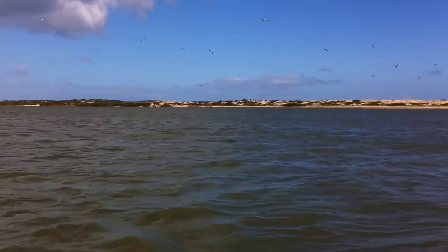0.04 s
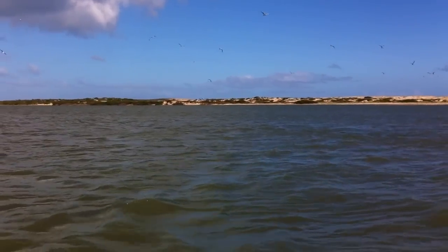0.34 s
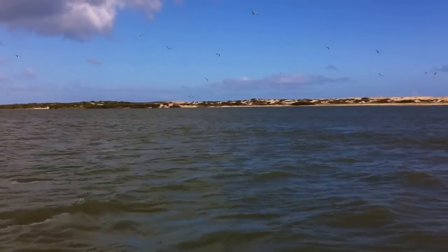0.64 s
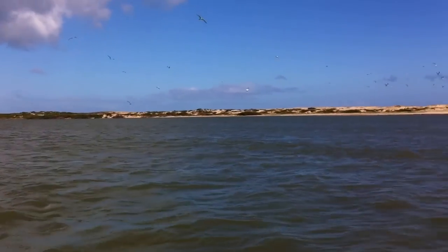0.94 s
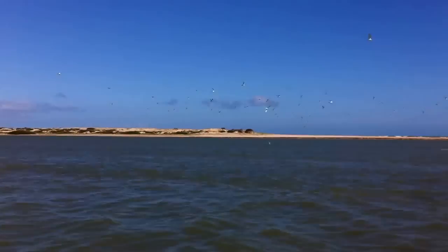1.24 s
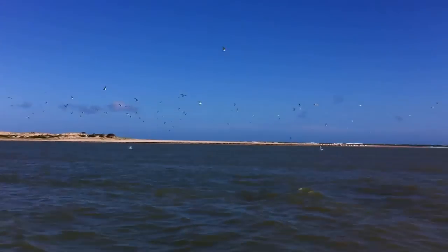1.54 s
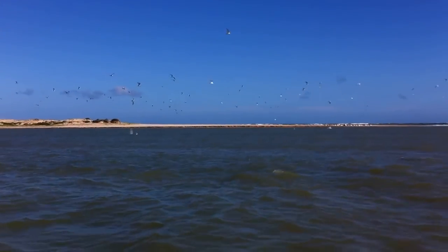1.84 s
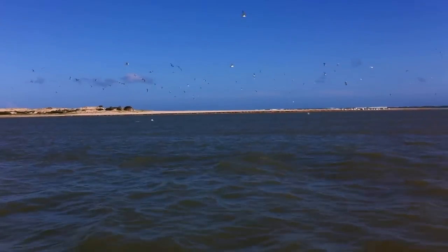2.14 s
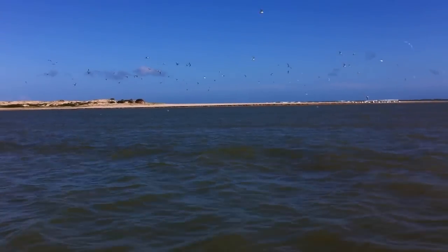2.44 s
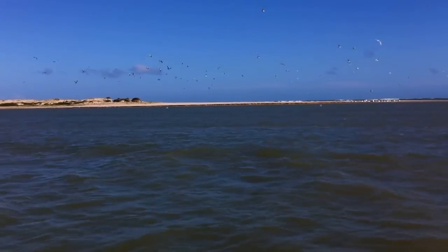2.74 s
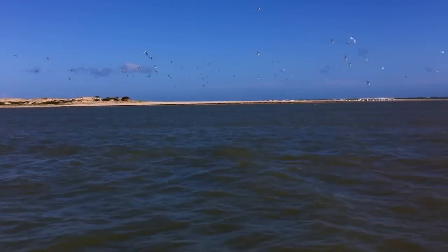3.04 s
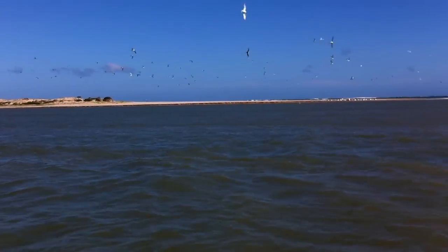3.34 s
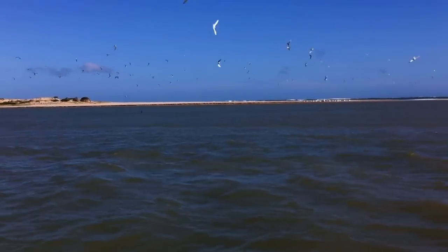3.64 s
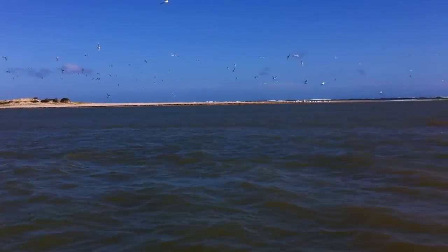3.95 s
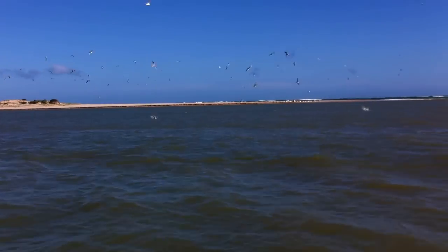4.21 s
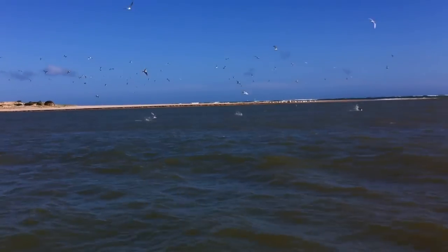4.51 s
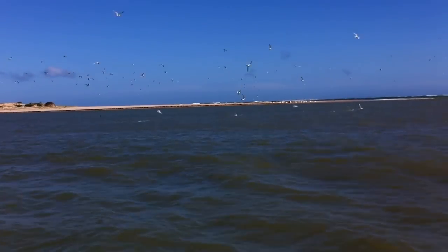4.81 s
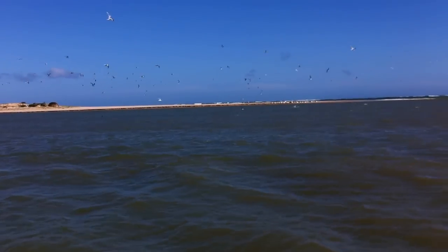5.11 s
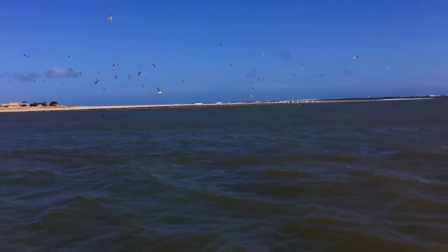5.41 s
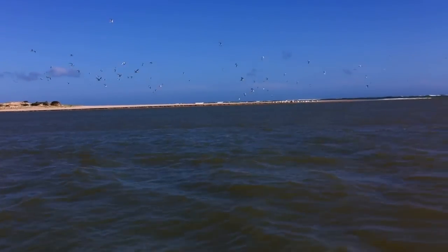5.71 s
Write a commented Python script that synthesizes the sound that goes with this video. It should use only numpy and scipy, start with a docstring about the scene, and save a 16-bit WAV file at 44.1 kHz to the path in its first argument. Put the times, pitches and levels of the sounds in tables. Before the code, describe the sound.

Wind buffets the microphone for the whole six seconds, just above choppy open water: an uneven low rumble with flutter and frequent dull thumps, hardest around 0.5, 1.3, 1.9 and 5.5 seconds. Much quieter, wavelets slosh and gurgle with a light fizz of spray. The water swells a little from about 3 to 4.7 seconds, and close drops land with tiny bright spits near 1.4, 3.7 and 4.6 seconds. Terns call at a distance in short, high, buzzy whistles, trilled and mostly falling. Several come in the first 0.8 seconds. At about 1.7 seconds one near bird gives a louder, quick rasping call that drops in steps, and others answer right after. More cries follow from 2.4 to 3.2 seconds, then a busier, overlapping run from 3.9 to 5.8 seconds, with the wind still gusting.

```python
"""A choppy estuary, heard from just above the water, with terns calling.
Wind eddies rumble, flutter and thump on the microphone. Wavelets slosh, trap ringing bubbles
and throw a fizz of spray. The terns' cries are buzzy, mostly falling whistles chopped by a
trill, some clearing at the end; one near bird gives a quick, rasping call that falls in steps."""
import sys
import numpy as np
from scipy import signal
from scipy.fft import rfft, irfft, next_fast_len
from scipy.io import wavfile
from scipy.ndimage import uniform_filter1d

SR = 44100
rng = np.random.default_rng(int(sys.argv[2]) if len(sys.argv) > 2 else 0)


def put_to_file(sound):
    """Save the sound as 16-bit audio at rate SR, in the file named by the first command-line argument."""
    columns = np.atleast_2d(sound).T  # one column per channel
    safe = np.clip(columns, -1, 1)
    whole_steps = np.round(safe * 32767)
    wavfile.write(sys.argv[1], SR, whole_steps.astype(np.int16))


N = 258867
T = np.arange(N) / SR
TOP_HZ = 15900
JITTER, RASP = .009, .02  # unsteadiness of a tern's voice, as shares of its pitch
BEAK_HZ, OVERTONE_DB_PER_OCTAVE = 3600, -45  # notes above this pitch lose their overtones

# bright hiss of the fizz and close drops, as coloured by the microphone: f/Hz, level/dB
HISS_AT_MIC = [(1500, 10.5), (3000, 10), (4500, 5), (6000, 9), (7000, 2.5), (9300, 3), (10300, -4.5),
               (11200, -5), (12000, 0), (13000, 0), (14200, -8), (16000, -4.5)]


def undb(db):
    """Decibels to gain."""
    return 10 ** (np.asarray(db) / 20)


def unit(x):
    """Scale to rms 1."""
    return x / np.sqrt(np.mean(x ** 2) + 1e-18)


def gains(table):
    """The dB columns of a level curve as a gain for every sample."""
    s, *columns = np.transpose(table)
    return [undb(np.interp(T, s, c)) for c in columns]


def colour(x, points):
    """Equalise by a curve of f/Hz, level/dB points."""
    hz, db = np.transpose(points)
    size = next_fast_len(len(x) + 2048)
    f = np.fft.rfftfreq(size, 1 / SR)
    response = undb(np.interp(np.log(f + 1), np.log(hz), db))
    return irfft(rfft(x, size) * response, size)[:len(x)]


def band(x, lo_hz, hi_hz):
    """Second-order band-pass."""
    edges = np.clip([lo_hz, max(hi_hz, 1.1 * lo_hz)], 10, [.4 * SR, .45 * SR])
    return signal.sosfilt(signal.butter(2, edges, "band", fs=SR, output="sos"), x)


def walk(rate):
    """Random modulation that glides to a new value rate times a second; rms 1."""
    hold = max(int(SR / rate), 1)
    steps = np.repeat(rng.standard_normal(N // hold + 1), hold)
    return unit(uniform_filter1d(steps, hold)[:N])


def even(x, span_s):
    """Level a texture to rms 1 over span_s, keeping its quick grain."""
    span = max(int(span_s * SR), 1)
    power = uniform_filter1d(uniform_filter1d(x ** 2, span), span)
    return x / np.sqrt(power + 1e-12)


def add(out, s, x):
    """Mix a short sound in at time s."""
    i = int(np.clip(s * SR, 0, len(out) - 1))
    out[i:i + len(x)] += x[:len(out) - i]


def bursts(rate, decay_s, rise_s=0.0025):
    """Little surges at random moments: each starts quickly and dies away."""
    starts = (rng.random(N) < rate / SR) * rng.random(N)
    surges = signal.lfilter([1], [1, -np.exp(-1 / (decay_s * SR))], starts)
    return uniform_filter1d(surges, max(int(rise_s * SR), 1))


def plateau(s, length, attack_s, release_s):
    """An envelope that rises around time s, holds and falls."""
    return np.clip(.5 + np.minimum((T - s) / attack_s, (s + length - T) / release_s), 0, 1)


def airflow(breeze_db=1, lull_db=3.5, breeze_flutter_db=-11, gust_db=-2.5):
    """Envelopes of the large and the small eddies: a restless breeze with short gusts over it."""
    # the breeze between gusts: t/s, level/dB
    breeze_curve = [(0.0, -23.5), (0.75, -25.5), (1.08, -33.5), (1.2, -29), (1.4, -21.5), (1.58, -33),
                    (1.8, -23), (2.0, -27.5), (2.72, -29), (3.0, -30), (3.21, -25.5), (3.6, -29),
                    (3.86, -30), (4.55, -26), (4.88, -33.5), (5.2, -21.5), (5.43, -30), (5.57, -19.5),
                    (5.7, -38), (5.87, -20.5)]
    # gusts: t/s, length/s, level/dB, share of small eddies/dB
    gusts = [(0.033, 0.026, -11.5, -20), (0.183, 0.2, -15.5, -12), (0.414, 0.062, -17, -10),
             (0.473, 0.22, -14, -10), (0.706, 0.076, -15.5, -30), (0.813, 0.097, -15, -15.5),
             (0.911, 0.1, -20.5, -11.5), (1.017, 0.04, -10.5, -26.5), (1.082, 0.072, -20.5, -24),
             (1.258, 0.17, -14, -12), (1.686, 0.037, -5.5, -15.5), (1.762, 0.079, -18, -14.5),
             (1.876, 0.015, -3.5, -6), (2.06, 0.062, -15.5, -15.5), (2.761, 0.062, -15, -16),
             (2.83, 0.082, -15, -12.5), (2.951, 0.022, -23, -3), (2.987, 0.069, -15.5, -8.5),
             (3.059, 0.034, -16.5, -4), (3.1, 0.046, -14, -9), (3.313, 0.077, -15.5, -14),
             (3.493, 0.18, -21, -9.5), (3.608, 0.18, -15.5, -12.5), (3.913, 0.11, -17.5, -18.5),
             (4.045, 0.039, -12, -17), (4.125, 0.019, -11.5, -21), (4.315, 0.043, -14, -16),
             (4.495, 0.023, -11.5, -20), (4.59, 0.041, -18, -9), (4.639, 0.05, -17, -9.5),
             (4.697, 0.059, -19.5, -26), (4.762, 0.06, -18, -20), (5.06, 0.072, -15.5, -12),
             (5.157, 0.031, -22, -20), (5.305, 0.076, -21, -4.5), (5.375, 0.017, -11.5, -8.5),
             (5.467, 0.1, -14.5, -11.5), (5.74, 0.055, -14, -12)]
    breeze = gains(breeze_curve)[0] * undb(breeze_db + lull_db * np.tanh(walk(30)))
    large, small = breeze, breeze * undb(breeze_flutter_db)
    for s, length, db, small_db in gusts:
        shape = plateau(s, length, attack_s=0.014, release_s=0.043)
        large = np.maximum(large, shape * undb(db + gust_db))
        small = np.maximum(small, shape * undb(db + small_db))
    return large, small


def wind(rumble_db=1.0, flutter_db=-1, patchy_db=4.2, tear=4.3):
    """Large eddies rumble without a break; small eddies ride on them and tear off in short bursts."""
    # tone colour of the large eddies: f/Hz, level/dB
    rumble_spectrum = [(20, -60), (40, -67), (62, -28), (100, -7), (140, 0.5), (185, 2.5), (300, -4.5),
                       (450, -14), (700, -25.5), (1200, -51), (2500, -85)]
    # tone colour of the small eddies: f/Hz, level/dB
    flutter_spectrum = [(150, -59), (350, 9.5), (550, 1.5), (750, -1.5), (1100, -10), (1500, -21.5),
                        (2400, -30), (5000, -64)]
    rumble_gain, flutter_gain = airflow()
    patchy = rng.standard_normal(N) * undb(patchy_db * walk(65))
    rumble = even(colour(patchy, rumble_spectrum), span_s=.03)
    torn = rng.standard_normal(N) * (1 + tear * bursts(rate=110, decay_s=0.0085))
    flutter = even(colour(torn, flutter_spectrum), span_s=0.019)
    return undb(rumble_db) * rumble_gain * rumble + undb(flutter_db) * flutter_gain * flutter


def puffs(puff_db=1, width_s=0.011):
    """A single eddy brushes the microphone port: the rumble swells for a few swings and is gone."""
    # soft puffs of air: t/s, level/dB
    eddies = [(2.234, -16.5), (2.28, -21.5), (2.318, -18.5), (2.397, -24), (2.44, -26.5), (2.516, -22),
              (2.609, -25.5), (2.683, -34), (3.136, -16.5), (3.232, -26), (3.258, -20), (3.491, -16),
              (3.651, -13.5), (3.685, -18), (3.834, -29), (3.963, -21.5), (3.988, -17), (4.241, -17),
              (4.434, -20), (4.655, -12.5), (4.783, -23), (4.898, -20.5), (4.984, -18), (5.233, -24),
              (5.332, -11), (5.7, -22.5)]
    swell = sum(undb(db) * np.exp(-((T - s) / width_s) ** 2) for s, db in eddies)
    rumble = even(band(rng.standard_normal(N), 137, 282), span_s=0.0038)
    return undb(puff_db) * swell * rumble


def buffets(body_db=-2, rise_s=0.0013, body_s=0.011, edge_db=-6, edge_s=0.0023, tear_db=-13,
            snap_db=-2, snap_at_s=0.00353, snap_s=0.00069):
    """A hard eddy hits the port: a torn edge, a snap of suction as its core passes, and a short thud."""
    # hard hits of air: t/s, edge level/dB, thud level/dB
    hits = [(0.252, -17, -11), (0.29, -27, -11.5), (0.317, -18, -7.5), (0.486, -8, -5.5),
            (0.501, -18, -10.5), (0.55, -25, -8), (0.569, -6, -3.5), (0.632, -26, -11), (0.652, -11.5, -12),
            (0.765, -39, -8.5), (0.933, -33, -7.5), (1.035, -35, -13), (1.223, -20, -18.5),
            (1.274, -15, -6.5), (1.329, -24, -14), (1.349, -6.5, -5), (1.61, -16, -18.5), (1.686, -3.5, -8),
            (1.881, 3.5, -1), (1.947, -30, -9.5), (2.032, -19, -12.5), (2.091, -20, -11),
            (2.807, -13, -9.5), (2.954, -1.5, -9), (3.17, -14, -42), (3.339, -8, -15), (3.345, -9, -7.5),
            (3.36, -23, -10.5), (3.422, -16, -17), (3.662, -15, -9.5), (3.718, -14, -9.5),
            (3.921, -34, -15.5), (4.053, -19, -11.5), (4.13, -10.5, -20), (4.356, -20, -9),
            (4.457, -15.5, -7), (4.596, -10.5, -14.5), (4.65, -28, -6), (5.02, -12, -15.5),
            (5.084, -28, -21), (5.106, -22, -14.5), (5.188, -33, -9), (5.282, -20, -11), (5.311, -24, -13),
            (5.463, -8, -13), (5.477, -10, -3), (5.503, -20, -22), (5.576, -20, -6.5), (5.648, -31, -14),
            (5.74, -10.5, -9), (5.756, -20, -9.5), (5.786, -6, -18), (5.83, -26, -10)]
    out, t = np.zeros(N), T[:4096]
    for s, peak_db, thud_db in hits:
        low, mid, top = rng.standard_normal((3, len(t)))
        body = even(band(low, 170, 296), 0.011) * (1 - np.exp(-t / rise_s)) * np.exp(-(t / body_s) ** 2)
        torn = even(band(mid, 537, 855), 0.013) + undb(tear_db) * unit(band(top, 960, 1200))
        edge = torn * np.minimum(t / 0.0004, 1) * np.exp(-(t / edge_s) ** 2)
        core_width_s = snap_s * undb(2 * rng.standard_normal())
        core = ((t - snap_at_s) / core_width_s) ** 2
        snap = (core - 1) * np.exp(-core / 2)
        thud = undb(body_db) * body + undb(snap_db) * snap
        add(out, s, undb(thud_db) * thud + undb(peak_db + edge_db) * edge)
    return out


def bubbles(size, count, centre_hz, octaves, cycles, spread_db, glide):
    """A cloud of small bubbles: each rings briefly and rises in pitch as it nears the surface."""
    out = np.zeros(size + 4096)
    for when, pitch, chance in rng.random((count, 3)):
        hz = centre_hz * 2 ** (octaves * (pitch - .5))
        samples = min(int(cycles * SR / hz) + 2, 4096)
        age = np.arange(samples) * hz / cycles / SR  # reaches 1 when the ring is 40 dB down
        ring = np.sin(2 * np.pi * cycles * age * (1 + glide * age / 2)) * np.exp(-np.log(100) * age)
        add(out, when * size / SR, ring * undb(-spread_db * np.log(max(chance, .01))))
    return out / np.sqrt(np.sum(out ** 2) / size)


def chop():
    """Envelopes of slosh and spray: the running chop, and crests that spill over it."""
    # the chop between washes: t/s, slosh level/dB, spray level/dB
    chop_curve = [(0.0, -48, -57.5), (0.21, -52, -60.5), (0.83, -51, -59.5), (1.03, -50, -62.5),
                  (1.2, -51.5, -63), (1.54, -50.5, -55.5), (1.8, -43, -57.5), (1.96, -47, -57),
                  (2.03, -57, -68.5), (2.15, -60, -62), (2.25, -53, -60.5), (2.93, -45.5, -53.5),
                  (3.45, -45.5, -50), (3.6, -43, -51), (3.74, -40.5, -59), (4.1, -78, -48.5),
                  (4.22, -53, -54.5), (4.58, -39.5, -51.5), (4.81, -47.5, -55), (5.07, -49.5, -58.5),
                  (5.26, -46, -53.5), (5.61, -49, -59), (5.87, -52, -60)]
    # spilling crests: t/s, length/s, slosh level/dB, spray level/dB
    washes = [(0.123, 0.061, -43.5, -55.5), (0.817, 0.099, -47, -56.5), (1.514, 0.045, -41, -57.5),
              (2.696, 0.14, -49.5, -50.5), (3.278, 0.11, -50, -47), (3.4, 0.083, -54, -49),
              (3.638, 0.14, -39, -48), (3.926, 0.13, -52, -47.5), (4.53, 0.11, -40, -49.5),
              (5.79, 0.12, -44.5, -52)]
    slosh, spray = gains(chop_curve)
    for s, length, slosh_db, spray_db in washes:
        shape = plateau(s, length, attack_s=0.018, release_s=0.029)
        slosh = np.maximum(slosh, shape * undb(slosh_db))
        spray = np.maximum(spray, shape * undb(spray_db))
    return slosh, spray


def water(slosh_db=6, spray_db=9, drop_db=-3, drop_spread_db=4, drops_per_s=900, fizz_db=-3):
    """Wavelets fold over into bubbles; their spray falls back as a fizz of tiny drops."""
    # tone colour of the slosh: f/Hz, level/dB
    slosh_spectrum = [(500, 14), (1000, 7), (1800, 1), (2800, 0), (4000, -0.5), (6000, -2), (9000, -51)]
    slosh_gain, spray_gain = chop()
    churn = walk(55)  # moves slosh and spray together
    froth = bubbles(N, count=3000, centre_hz=1998, octaves=2.348, cycles=40, spread_db=1, glide=0.44)
    slosh = rng.standard_normal(N) + froth[:N]
    slosh *= 1 + 0.17 * bursts(rate=64, decay_s=0.015)
    slosh = even(colour(slosh * undb(2 * churn), slosh_spectrum), span_s=0.23)
    drop_sizes = undb(drop_spread_db * np.minimum(rng.exponential(size=N), 5.5))
    drops = unit((rng.random(N) < drops_per_s / SR) * drop_sizes * rng.choice([-1, 1], N))
    fizz = bubbles(N, count=8000, centre_hz=7545, octaves=1.81, cycles=46, spread_db=2.5, glide=0.027)
    spray = rng.standard_normal(N) + undb(drop_db) * drops + undb(fizz_db) * fizz[:N]
    spray *= 1 + .75 * bursts(rate=45, decay_s=.011, rise_s=0.0028)
    spray = even(colour(spray * undb(churn), HISS_AT_MIC), span_s=.15)
    return undb(slosh_db) * slosh_gain * slosh + undb(spray_db) * spray_gain * spray


def gurgles(gurgle_db=-1, bubbles_per_s=900):
    """A breaking wavelet traps a cluster of bubbles of about one size."""
    # wavelets that break close by: t/s, length/s, centre f/Hz, level/dB
    wavelets = [(0.056, 0.04, 1720, -40.5), (0.837, 0.041, 2590, -39.5), (1.234, 0.015, 3000, -42.5),
                (1.508, 0.033, 1870, -46), (1.612, 0.023, 1840, -41), (2.176, 0.026, 1820, -45.5),
                (2.397, 0.044, 1100, -38), (2.546, 0.018, 1340, -36.5), (2.954, 0.006, 1340, -25),
                (3.082, 0.027, 2720, -40), (3.567, 0.015, 2020, -35.5), (3.716, 0.031, 1650, -39),
                (4.366, 0.078, 1380, -36), (4.525, 0.026, 1760, -31), (4.584, 0.031, 1970, -37.5),
                (5.007, 0.026, 3330, -38.5)]
    out = np.zeros(N)
    for s, length, hz, db in wavelets:
        cloud = bubbles(int(length * SR), count=int(length * bubbles_per_s) + 1, centre_hz=hz,
                        octaves=0.56, cycles=9.8, spread_db=-0.5, glide=0.055)
        add(out, s, undb(db + gurgle_db) * cloud)
    return out


def close_drops(drop_db=-6, glide_per_s=70, attack_s=.0007, ring_s=.0015):
    """A drop of spray lands with a short, bright spit and a tiny rising plink."""
    # drops near the microphone: t/s, level/dB, spit decay/s, plink f/Hz, plink level/dB
    landings = [(0.132, -35, 0.008, 8000, -15), (0.753, -34.5, 0.007, 5000, -15),
                (1.35, -24, 0.0037, 5500, -7), (1.514, -30, 0.011, 3000, -15),
                (1.612, -27, 0.002, 5000, -12), (1.619, -24, 0.004, 6030, -15),
                (2.783, -30, 0.002, 5100, 9), (3.167, -25.5, 0.016, 5970, -10),
                (3.472, -26, 0.0063, 8160, -1), (3.741, -17, 0.005, 6900, -8),
                (4.029, -25, 0.0037, 7960, -12), (4.605, -22, 0.0062, 3200, -11),
                (5.085, -29, 0.03, 5800, 0), (5.593, -26.5, 0.0049, 5060, -13)]
    out, t = np.zeros(N), T[:2048]
    rise, ring = np.minimum(t / attack_s, 1), np.exp(-t / ring_s)
    for s, db, decay_s, hz, plink_db in landings:
        hiss = unit(colour(rng.standard_normal(len(t)), HISS_AT_MIC))
        spit = hiss * np.exp(-t / max(decay_s, .001))
        plink = np.sin(2 * np.pi * hz * t * (1 + glide_per_s * t / 2)) * ring
        add(out, s, undb(db + drop_db) * rise * (spit + 2 * undb(plink_db) * plink))
    return out


def ripple_echo(x, wet_db=-12, decay_s=0.017):
    """The rough water scatters a faint, short smear after each call."""
    t = T[:8192]
    scatter = rng.standard_normal(len(t)) * np.exp(-t / decay_s)
    return x + undb(wet_db) * signal.fftconvolve(x, scatter / np.linalg.norm(scatter))[:N]


def terns(hoarse=0.71, fading_db=1.5, overtone_db=-9.5):
    """Arched whistles, chopped by a trill into hoarse chirps; an ending may clear, swell or fade."""
    # buzzy cries: t/s, length/s, first f/Hz, last f/Hz, level/dB, lift of the ending/dB,
    # trill rate/Hz, trill depth/0-1, trill depth of the ending/0-1
    cries = [(0.010, 0.24, 5960, 6200, -51, -1, 105.6, 0.47, 0.8),
             (0.221, 0.11, 6120, 6020, -47, -4, 103.5, 0.2, 0.2),
             (0.098, 0.15, 4660, 4680, -44.5, -1, 100, 1, 0.8),
             (0.24, 0.11, 4620, 4500, -51, -3, 100, 0.4, 0.4),
             (0.385, 0.085, 4750, 4620, -56.5, 0, 110, 0.8, 0.9),
             (0.465, 0.27, 4420, 4200, -51.5, -3, 110, 0.7, 1),
             (0.58, 0.19, 3780, 3660, -61, 5, 107, 0.5, 0.76),
             (0.61, 0.056, 5450, 5130, -50, 1, 115, 0.96, 1),
             (1.275, 0.062, 5780, 5000, -52, -4, 100, 0.3, 1),
             (1.798, 0.035, 2930, 2620, -43, 4, 55, 0.4, 0.1),
             (1.86, 0.12, 3520, 3430, -44.5, -2, 91, 0, 0.3),
             (1.978, 0.024, 6500, 6040, -56, 0, 90, 0.2, 0.2),
             (1.830, 0.034, 4430, 4300, -45, 0, 170, 0.9, 1),
             (1.833, 0.036, 6140, 6100, -50, 0, 169, 0.9, 0.9),
             (1.830, .17, 5470, 4900, -52, 6, 87.5, 0.9, 0.6),
             (2.408, 0.11, 3110, 3660, -49.5, -7, 98, 1, 1),
             (2.476, 0.14, 4660, 4420, -48, -1, 86.6, 0.9, 1),
             (2.507, 0.16, 3090, 2840, -51.5, -2, 89, 0.9, .8),
             (2.758, .28, 4570, 4530, -47, 1, 89.3, 1, .8), (3.022, .14, 4420, 4140, -48, 2, 90, 0.7, 0.7),
             (3.906, 0.084, 3360, 3540, -48, 0, 117.8, 0.9, .6),
             (3.975, 0.16, 3610, 3460, -42.5, 0, 114, 0.6, 0.6),
             (4.059, 0.056, 5800, 5130, -42, -3, 90, 0.1, 0.8),
             (4.112, 0.066, 4520, 4350, -43.5, 0, 50, 0.8, 0.6),
             (4.17, 0.071, 3120, 2830, -46.5, -2, 90, 0.6, 0.5),
             (4.174, 0.07, 6220, 5800, -47.5, -5, 90, 0.3, 0.5),
             (4.63, 0.1, 3300, 3100, -42.5, -1, 88, 0.1, 0.25),
             (4.725, 0.063, 3090, 2950, -44, -1, 88, 0.7, 1),
             (4.648, .055, 5750, 5540, -49, -4, 90, .15, .15),
             (4.677, 0.17, 4990, 4620, -47.5, 0, 89.7, 0.95, 0.9),
             (4.845, 0.103, 4540, 4440, -42.5, 8, 89, 0.5, 0.15),
             (4.955, 0.065, 4440, 4120, -47, 0, 90, 0.7, 0.7),
             (5.026, 0.048, 4240, 4020, -46.5, -1, 90, 0.2, 0.1),
             (5.21, 0.048, 4650, 4430, -46, 2, 89.5, 0.4, 0.35),
             (5.268, 0.08, 4100, 3650, -43.5, 0, 158, 1, 1),
             (5.282, 0.04, 4530, 4720, -40.5, 1, 126, 0.25, 0.3),
             (5.315, 0.055, 4860, 4900, -42.5, -3, 124, 0.3, 0.6),
             (5.3, 0.1, 5750, 5280, -53, 0, 139, 1, 1), (5.388, 0.1, 4680, 4180, -47, -1, 90, 0.6, 0.35),
             (5.672, 0.085, 4270, 4170, -44.5, -2, 83.3, 0.78, 0.85),
             (5.675, 0.06, 5370, 5450, -54, 0, 82, 1, 1)]
    # how throat and beak favour the overtones: f/Hz, level/dB
    beak_response = [(5500, -5), (7000, -3), (8600, 0), (10500, -7), (13000, -14), (16000, -30)]
    beak_hz, beak_db = np.transpose(beak_response)
    arch, hook, wander, trill_swing = 0.0112, .07, .005, .032  # shares of the pitch
    hook_s, sag_power = .0012, 1.25  # a note starts sharp, drops onto its pitch, then bends ever faster
    attack, ending_at, turn, fade = 0.032, 0.46, 0.25, .13  # shares of the note's length
    closest_s, closest_length_s, far_loss_db = 1.85, .35, 2  # the air dulls the farther calls
    waver, quiver, tempo = walk(220), walk(1100), walk(40)
    fading, grit, drift = walk(90), walk(1700), walk(35)
    out = np.zeros(N)
    for s, length, first_hz, last_hz, db, ending_db, trill_hz, first_depth, last_depth in cries:
        t = T[:int(length * SR)]
        here = int(s * SR) + np.arange(len(t))
        progress = t / length
        bow = np.sin(np.pi * progress)
        ending = np.clip((progress - ending_at) / turn + .5, 0, 1)
        depth = np.clip(first_depth + (last_depth - first_depth) * ending, 0, 1)
        glide_hz = first_hz + (last_hz - first_hz) * progress ** sag_power
        contour_hz = glide_hz * (1 + arch * bow + hook * np.exp(-t / hook_s) + wander * drift[here])
        trill = 2 * np.pi * np.cumsum(trill_hz * (1 + 0.064 * tempo[here])) / SR
        buzz = depth ** 2 * (RASP * quiver[here] - trill_swing * np.sin(trill))
        hz = contour_hz * (1 + buzz + JITTER * waver[here])
        phase = 2 * np.pi * np.cumsum(hz) / SR
        overtones = sum(undb(np.interp(k * first_hz, beak_hz, beak_db)) * np.sin(k * phase)
                        for k in (2, 3) if k * first_hz < TOP_HZ)
        far = 1 - np.exp(-((s - closest_s) / closest_length_s) ** 2)
        octaves_above = max(np.log2(first_hz / BEAK_HZ), 0)
        bright_db = overtone_db - far_loss_db * far + OVERTONE_DB_PER_OCTAVE * octaves_above
        envelope = np.clip(np.minimum(progress / attack, (1 - progress) / fade), 0, 1)
        envelope *= (1 + 0.088 * bow) * undb(ending_db * ending)
        envelope *= (1 - depth * np.cos(trill)) * (1 + hoarse * depth * grit[here])
        envelope *= undb(fading_db * fading[here])  # calls on the wing fade in and out
        cry = unit(envelope * np.sin(phase)) + undb(bright_db) * unit(envelope * overtones)
        add(out, s, undb(db) * cry)
    return out


def near_tern(octave_db=-8, second_hz=3250, second_db=-36):
    """A loud falling whistle; at each catch it rasps and the syrinx's other side adds a lower tone."""
    # one breath that falls through catches of the voice: t/s, f/Hz, level/dB, rasp/0-1
    call = [(1.667, 5750, -45, .3), (1.670, 5950, -33, .1), (1.675, 6050, -28, .1), (1.684, 5780, -33, .4),
            (1.691, 5720, -31, .5), (1.693, 5380, -29, .5), (1.702, 5380, -32, .4), (1.705, 5600, -39, 1),
            (1.712, 5250, -33, .8), (1.715, 4480, -24, .1), (1.724, 4400, -26, .1), (1.728, 4800, -35, 1),
            (1.732, 4800, -31, 1), (1.735, 4360, -25, .1), (1.744, 4420, -26, .1), (1.748, 4600, -35, .9),
            (1.753, 4800, -37, 1), (1.756, 4320, -25, .1), (1.771, 4450, -31, .3), (1.779, 4200, -29, .1),
            (1.788, 4320, -32, .2), (1.8, 4450, -46, .5)]
    s, *columns = np.transpose(call)
    hz, db, rasp = (np.interp(T, s, c) for c in columns)
    wobble = (JITTER / 2 + RASP * rasp) * walk(1500)
    phase = 2 * np.pi * np.cumsum(hz * (1 + wobble)) / SR
    octave_gain = undb(octave_db + OVERTONE_DB_PER_OCTAVE * np.log2(hz / BEAK_HZ))
    whistle = np.sin(phase) + octave_gain * np.sin(2 * phase)
    voice = whistle * undb(db) * (1 + .5 * rasp * walk(1200))
    second_phase = 2 * np.pi * np.cumsum(second_hz * (1 + JITTER * walk(400))) / SR
    second_voice = undb(second_db) * rasp ** 2 * np.sin(second_phase)
    return (voice + second_voice) * plateau(s[0], s[-1] - s[0], attack_s=.002, release_s=.004)


def scene(birds_db=-0.5):
    """A bed of wind and water with the birds over it, in mono."""
    air = wind() + puffs() + buffets()
    estuary = water() + gurgles() + close_drops()
    birds = ripple_echo(terns() + near_tern())
    return (air + estuary + undb(birds_db) * birds)[None]


def record(dry):
    """The microphone drops the deepest bass; the hardest buffets round off; the top is cut."""
    lean = signal.sosfilt(signal.butter(2, 55, "high", fs=SR, output="sos"), dry)
    rounded = lean / (1 + lean ** 6) ** (1 / 6)
    return signal.sosfilt(signal.ellip(10, .2, 80, TOP_HZ, fs=SR, output="sos"), rounded)


dry = scene()
out = record(dry)
put_to_file(out)
```